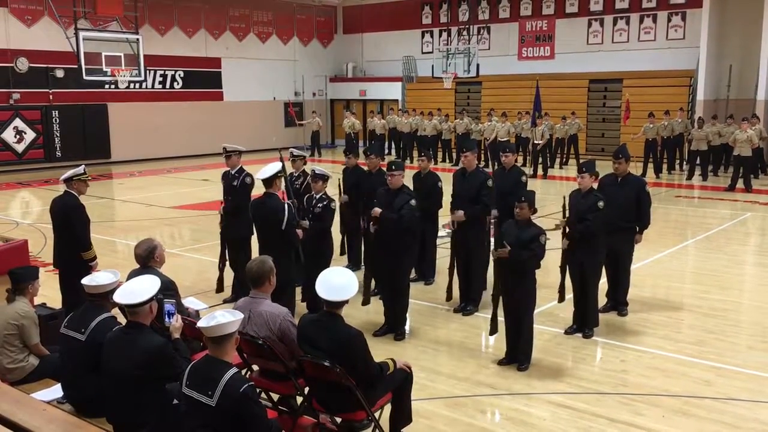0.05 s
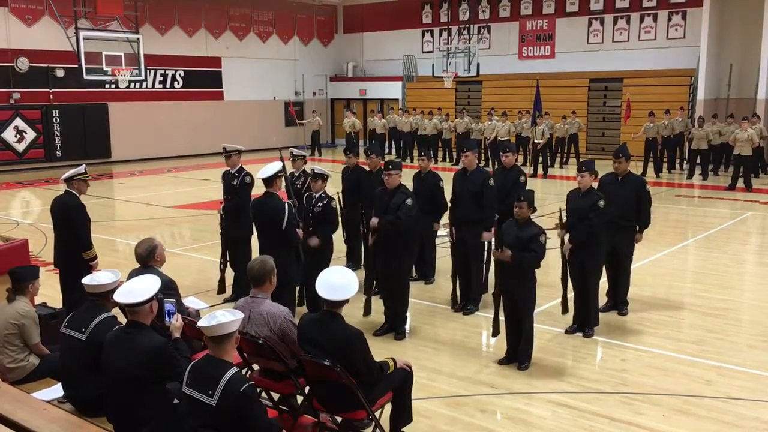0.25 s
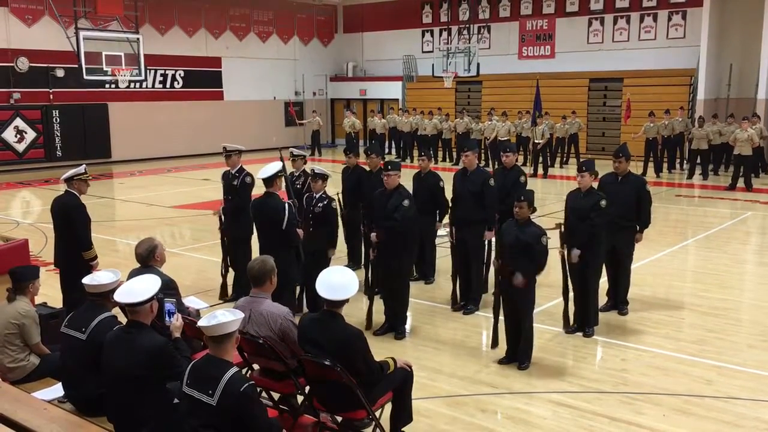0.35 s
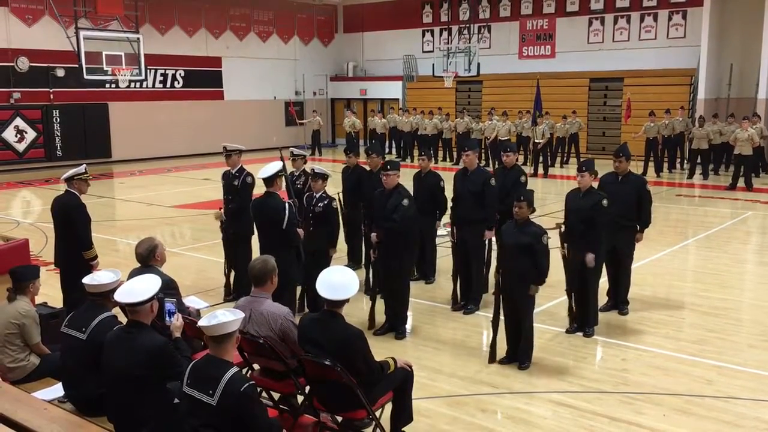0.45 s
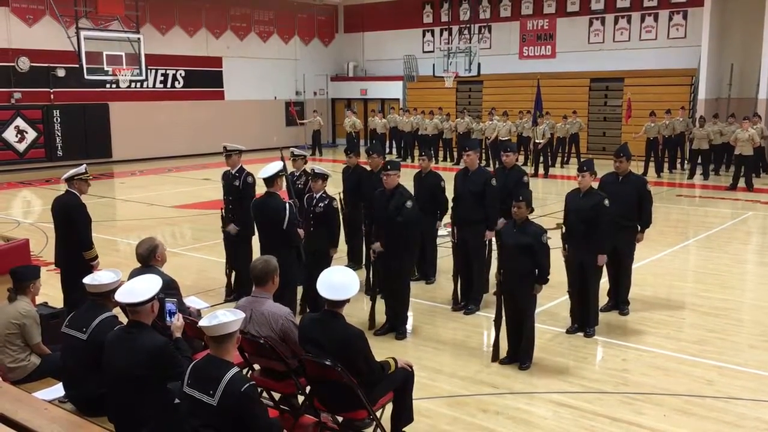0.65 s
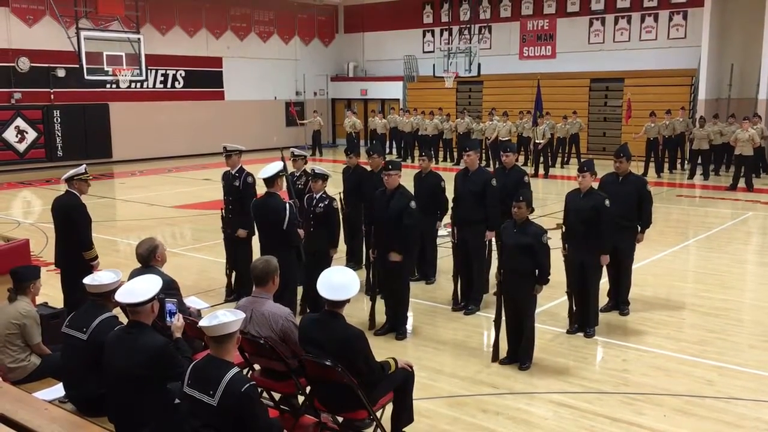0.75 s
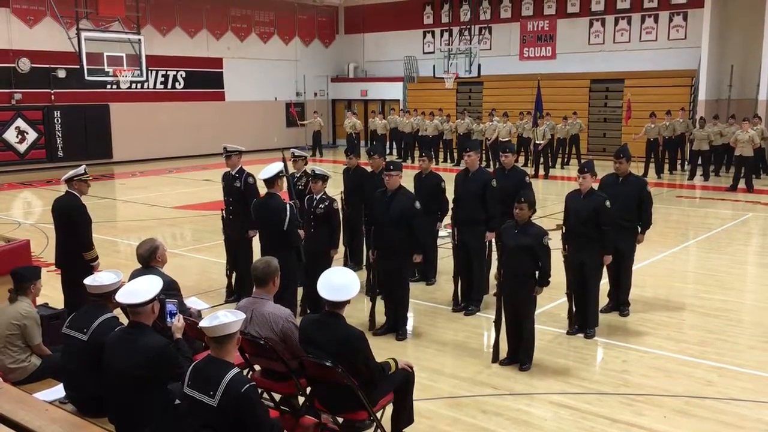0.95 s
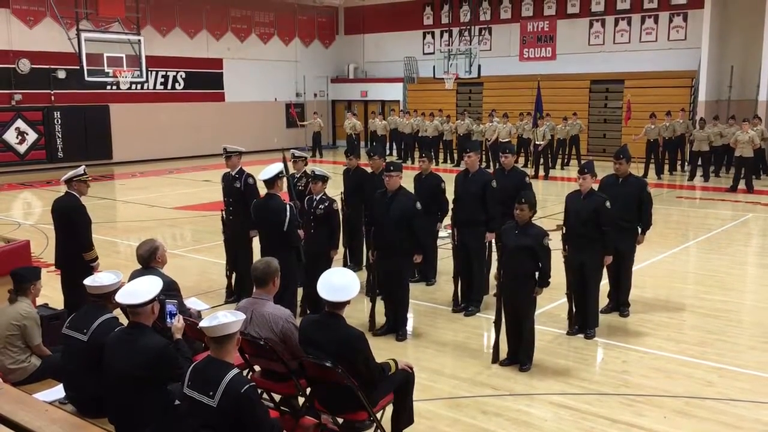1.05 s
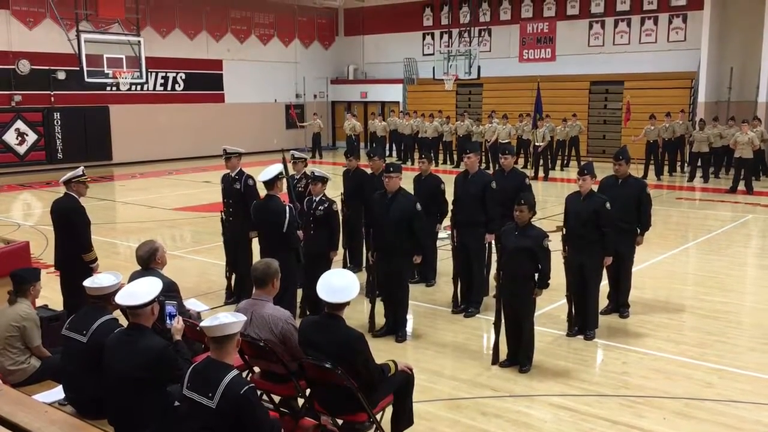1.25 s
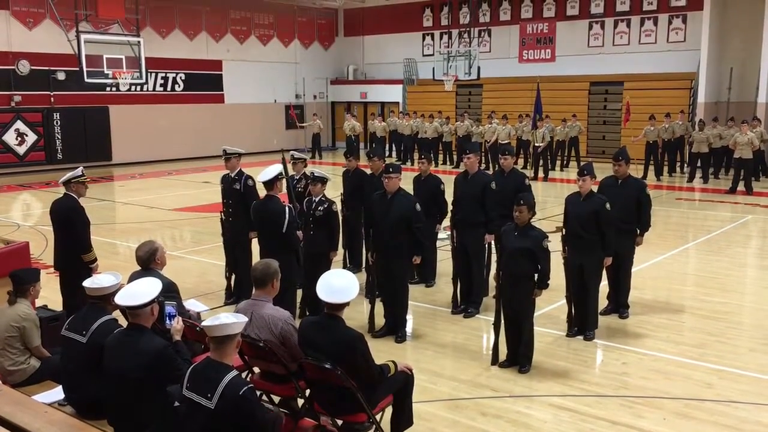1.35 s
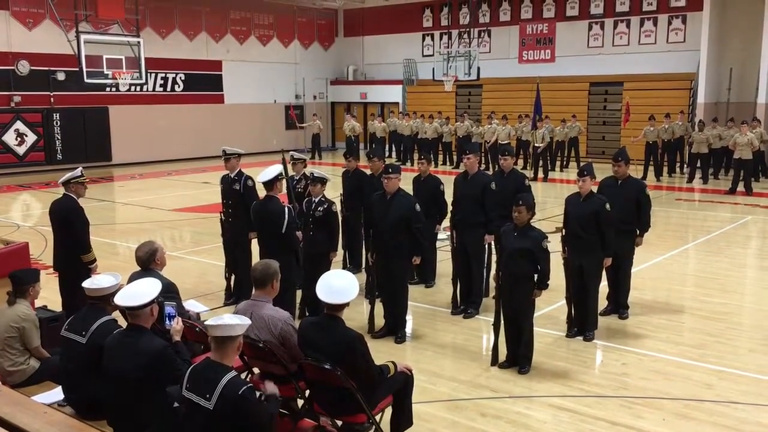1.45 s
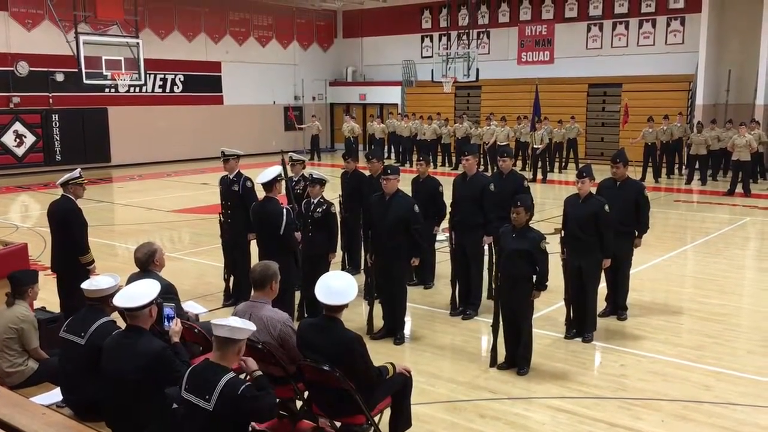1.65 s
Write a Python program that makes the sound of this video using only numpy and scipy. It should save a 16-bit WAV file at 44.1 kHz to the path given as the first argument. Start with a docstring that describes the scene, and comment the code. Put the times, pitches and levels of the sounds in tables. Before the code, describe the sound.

In a large, echoing gym, sleeves rustle softly, then several rifle butts knock down on the floorboards in three uneven clusters with sharp metallic clacks. The boomy reverberation dies away over a steady ventilation hum.

```python
"""A drill team grounds its rifles on the sprung wooden floor of a large gym, in three ragged volleys.
First, over the hum of the ventilation, cloth rustles and the rifles tick as they are handled.
Then each butt strikes: the impact excites the damped modes of boards and stock, a thump and a crack,
while jolted metal parts clack and a small fitting rings very high.
Last, the hall's reverberation dies away, slowest in the bass, with a few dull booms in its tail."""
import sys
import numpy as np
from scipy import signal
from scipy.fft import rfft, irfft
from scipy.io import wavfile

SR = 44100
rng = np.random.default_rng(int(sys.argv[2]) if len(sys.argv) > 2 else 0)


def digitize_waveform(pressure):
    """Quantize a signal to 16-bit integers and store it at the path in sys.argv[1].

    Rows of a 2-D input are taken as channels; values are limited to [-1, 1].
    """
    field = np.atleast_2d(pressure).T
    bounded = np.clip(field, -1, 1)
    quanta = np.round(bounded * 32767).astype(np.int16)
    wavfile.write(sys.argv[1], SR, quanta)


N = 74970
T = np.arange(N) / SR
EVENT_T = T[:12000]  # time axis of one short event


def amp(db):
    """Decibels as an amplitude ratio."""
    return 10 ** (np.asarray(db) / 20)


def unit_rms(x):
    """Normalisation to an rms of 1."""
    return x / np.sqrt(np.mean(x ** 2) + 1e-20)


def curve(table, hz, column=1):
    """Interpolation of one table column over log frequency."""
    columns = np.transpose(table)
    return np.interp(np.log(hz + 1), np.log(columns[0]), columns[column])


def decay(t, t60):
    """Exponential decay: 60 dB in t60 seconds."""
    return np.exp(-np.log(1000) * t / np.maximum(t60, 1e-3))


def onset(rise_s, t=EVENT_T):
    """First-order rise with time constant rise_s."""
    return 1 - np.exp(-t / rise_s)


def placed(start_s, sound):
    """A pure delay: the sound begins at start_s on a full-length track."""
    return np.concatenate([np.zeros(max(round(start_s * SR), 0)), sound, np.zeros(N)])[:N]


def mode(hz, db, t60):
    """Free vibration of a damped oscillator."""
    return amp(db) * decay(EVENT_T, t60) * np.sin(2 * np.pi * hz * EVENT_T)


def ring(modes, hz):
    """Superposition of damped modes at ratios of one pitch."""
    return sum(mode(hz * ratio, db, t60) for ratio, db, t60 in modes)


def burst(t60):
    """A broadband transient: white noise under exponential decay."""
    return decay(EVENT_T, t60) * rng.standard_normal(len(EVENT_T))


def coloured_noise(gain):
    """Spectral shaping of white noise, at unit rms."""
    return unit_rms(irfft(rfft(rng.standard_normal(N)) * gain, N))


def ventilation():
    """Broadband rumble and hiss, plus two hum tones that waver by slow amplitude modulation."""
    # air noise spectrum: frequency_hz, density_db
    air_spectrum = [(20, -14), (40, -10), (60, 11), (85, -5.5), (140, -9), (220, -14.5), (330, -24.5),
                    (500, -33.5), (1000, -37), (2000, -45.5), (2800, -47.5), (4000, -51), (7000, -56.5),
                    (10000, -62.5), (16000, -60)]
    # hum tones: pitch_hz, rms_db
    hum_tones = [(59.2, -40.5), (102.3, -48)]
    hz = np.fft.rfftfreq(N, 1 / SR)
    air = coloured_noise(amp(curve(air_spectrum, hz)) * np.minimum(hz / 20, 1))
    waver = coloured_noise(np.exp(-(hz / 5) ** 2))
    hum = sum(amp(db) * np.sqrt(2) * np.sin(2 * np.pi * (f * T + rng.random())) for f, db in hum_tones)
    return amp(-40.5) * air + hum * (1 + 0.1 * waver)


def rustle():
    """Friction noise of sleeves and slings as the rifles come down."""
    # cloth noise spectrum: frequency_hz, density_db
    cloth_spectrum = [(200, 12), (700, 0.5), (1400, 8.5), (2100, 7.5), (2750, -13), (3500, 3), (6500, 2.5),
                      (8000, 0.5), (15000, -22.5)]
    # its envelope: time_s, level_db
    envelope = [(0, -61.5), (0.06, -63), (0.09, -52), (0.14, -61), (0.21, -63.5), (0.3, -62), (0.5, -99)]
    cloth = coloured_noise(amp(curve(cloth_spectrum, np.fft.rfftfreq(N, 1 / SR))))
    return cloth * amp(np.interp(T, *np.transpose(envelope)))


def hall(x):
    """Reverberation: convolution with a diffuse response, drawn anew for each spot on the floor."""
    # reverberant tail: frequency_hz, level_db, t60_s
    bands = [(40, -10, 3.6), (75, 0.5, 3.54), (162, 1.5, 2.74), (280, -0.5, 1.2), (350, 0, 1.4),
             (436, -8, 1.6), (557, -1.5, 1.3), (740, -1.5, 1.63), (1040, -2, 1.25), (1670, -3, 1.45),
             (1730, -1.5, 1.57), (2450, 1, 1.26), (2800, 6.5, 1.66), (3200, 1.5, 1.32), (4100, -0.5, 1.245),
             (6570, -1.5, 1.044), (9100, -0.5, 0.91), (15000, -3.5, 0.78)]
    hz, t, noise = signal.stft(rng.standard_normal(N), SR, nperseg=512)
    decaying = noise * amp(curve(bands, hz))[:, None] * decay(t, curve(bands, hz, column=2)[:, None])
    early_scatter = 1 + amp(-4.5) * decay(T, t60=0.074)
    response = signal.istft(decaying, SR)[1][:N] * onset(rise_s=0.005, t=T) * early_scatter
    return signal.fftconvolve(x, response / np.sqrt(SR / 10))[:N]


def booms():
    """Damped low oscillations swell the bass a few times as the tail dies."""
    # dull booms: start_s, level_db, pitch_hz
    swells = [(0.724, -15, 90), (0.790, -21, 95), (0.897, -22, 100), (1.078, -18.5, 100), (1.200, -25, 88),
              (1.51, -29, 62)]
    return sum(placed(s, mode(hz, db, t60=0.17) * onset(rise_s=0.004)) for s, db, hz in swells)


def crack(db, tilt_db):
    """Modal overlap: dense wood resonances merge into noise, each band with its own damping."""
    # spectrum of butt and stock: frequency_hz, density_db, t60_s
    bands = [(198, -3.5, 0.094), (300, 1, 0.11), (415, -0.5, 0.046), (598, 1, 0.065), (724, -3.5, 0.037),
             (980, 2.5, 0.034), (1667, 8.5, 0.031), (2190, 0, 0.023), (2840, -13.5, 0.023),
             (3300, -6, 0.062), (4400, -3, 0.046), (4810, -8.5, 0.043), (6020, -2.5, 0.039),
             (7560, -12, 0.053), (11900, -13.5, 0.049), (16000, -18.5, 0.018)]
    hz = np.fft.rfftfreq(len(EVENT_T), 1 / SR)
    tilted_db = curve(bands, hz) + tilt_db * np.log2((hz + 1) / 2000)
    colour = unit_rms(amp(tilted_db) * hz / (hz + 100))  # bass rolls off below 100 Hz
    spectrum = rfft(rng.standard_normal(len(EVENT_T))) * colour
    centres_hz, _, t60s = np.transpose(bands)
    weights = [np.interp(np.log(hz + 1), np.log(centres_hz), peak) for peak in np.eye(len(bands))]
    wood = sum(irfft(spectrum * weight) * decay(EVENT_T, t60) for weight, t60 in zip(weights, t60s))
    return amp(db) * wood * onset(rise_s=0.00067)


def handling_ticks():
    """Light impacts on handled rifles: faint cracks with added damping."""
    # ticks: start_s, level_db, tilt_db_per_octave
    touches = [(0.066, -41, 0), (0.077, -53, 7), (0.089, -50, -4), (0.098, -46, -4), (0.1018, -39, 6.5),
               (0.12, -49, -2), (0.163, -50, -2), (0.223, -45.5, 2), (0.663, -38, 1), (0.800, -53.5, -3),
               (0.883, -48, 5)]
    ticks = sum(placed(s, crack(db, tilt) * decay(EVENT_T, t60=0.07)) for s, db, tilt in touches)
    return signal.sosfilt(signal.butter(2, 11000, fs=SR, output="sos"), ticks)


def fitting_pings():
    """A small fitting vibrates freely in one very high, lightly damped mode."""
    # pings: start_s, level_db
    pings = [(0.066, -44), (0.098, -50), (0.507, -43), (0.589, -44), (0.660, -47), (0.810, -54),
             (0.884, -47)]
    pitch_hz, spread_hz = 13290, 45
    return sum(placed(s, mode(rng.normal(pitch_hz, spread_hz), db, t60=0.15) * onset(rise_s=0.003))
               for s, db in pings)


def steel_snaps():
    """Steel meets steel: a brief contact gives a transient rich in treble."""
    # snaps: start_s, level_db
    contacts = [(0.237, -32), (0.2415, -27), (0.2487, -27), (0.4775, -24.5), (0.5007, -37)]
    snaps = sum(placed(s, amp(db) * burst(t60=0.011)) for s, db in contacts)
    return signal.sosfilt(signal.butter(2, 7000, "highpass", fs=SR, output="sos"), snaps)


def rifle_parts():
    """Loose metal clacks in inharmonic modes and reverberates along with the snaps, ticks and pings."""
    # clacks: start_s, level_db, pitch_hz, hall_send_db
    jolts = [(0.234, -31, 5920, 4), (0.238, -22.5, 4520, 1.5), (0.2448, -22, 6530, -0.5),
             (0.2500, -31, 6720, 0), (0.3100, -31.5, 6510, 5), (0.315, -34, 1560, 1),
             (0.318, -25.5, 4150, -0.5), (0.3155, -34.5, 11100, 4), (0.4805, -26, 2335, 2.5),
             (0.4820, -30, 3900, 2), (0.484, -28, 9200, -3.5), (0.4890, -33.5, 2166, 0),
             (0.504, -26.5, 3460, -17)]
    # modes of a metal part: pitch_ratio, level_db, t60_s
    metal_modes = [(.62, -15.5, 0.012), (.96, -10, 0.011), (1, -1, 0.018), (1.04, -12, 0.025),
                   (1.29, -7.5, 0.014), (1.85, -19, 0.012), (2.6, -14, 0.018)]
    clacks = [placed(s, amp(db) * (ring(metal_modes, hz) + amp(-12.5) * burst(t60=0.026)))
              for s, db, hz, _ in jolts]
    snaps, ticks, pings = steel_snaps(), handling_ticks(), fitting_pings()
    to_hall = sum(amp(send_db) * clack for (*_, send_db), clack in zip(jolts, clacks))
    to_hall += amp(-12) * snaps + amp(-4.5) * ticks + amp(-20) * pings
    return sum(clacks) + snaps + ticks + pings + hall(to_hall)


def stock_ring():
    """Free vibration of a wooden stock; its modes vary in tuning and polarity from rifle to rifle."""
    # modes of the stock: pitch_hz, level_db, t60_s
    stock_modes = [(533, -5, 0.064), (892, -4, 0.12), (1052, 0, 0.089), (1317, -28, 0.04), (1532, -1, 0.11),
                   (1911, -9.5, 0.061), (2206, -1, 0.096), (3200, -10, 0.091), (3620, -5.5, 0.03)]
    detune = 0.0277
    return sum(np.sign(rng.standard_normal()) * mode(hz * np.exp(rng.normal(0, detune)), db, t60)
               for hz, db, t60 in stock_modes)


def butt_strikes():
    """Impact excitation: each butt thumps the boards, cracks, rings its stock and drives the hall."""
    # landings: start_s, thump_db, pitch_hz, crack_db, tilt_db_per_octave, hall_send_db
    landings = [(0.2330, -9.5, 289, -16.5, -5.5, -2.5), (0.2496, -17.5, 529, -34, 0.5, -0.5),
                (0.2998, -15.5, 140.4, -29.5, -1, 4), (0.3061, -21.5, 218, -24.5, -3, -5.5),
                (0.3130, -11, 205.5, -18.5, -2, -1), (0.326, -21.5, 190, -30.5, 2, 3.5),
                (0.3347, -10.5, 188, -33, 3, -4.5), (0.473, -5, 229.5, -24, -1.5, -2.5),
                (0.4791, -11, 117, -23, 0, 1), (0.4874, -23, 140, -22.5, 1, 4.5),
                (0.5018, -7, 237, -20.5, -0.5, -3), (0.5357, -15, 136, -42, -2, -7)]
    # modes of the floorboards: pitch_ratio, level_db, t60_s
    board_modes = [(.42, -7, 0.048), (.72, -2.5, 0.039), (1, 4, 0.027), (1.55, -13.5, 0.02),
                   (2.0, -21.5, 0.014)]
    out = np.zeros(N)
    for s, thump_db, hz, crack_db, tilt_db, send_db in landings:
        thump = placed(s, amp(thump_db) * ring(board_modes, hz) * onset(rise_s=0.0017))
        stock = amp(crack_db - 18) * stock_ring()
        wood = placed(s, crack(crack_db, tilt_db) + stock)
        out += thump + wood + amp(send_db) * hall(amp(1.5) * thump + amp(1) * wood)
    return out


def scene():
    """Linear superposition of all sources in one channel."""
    return (butt_strikes() + rifle_parts() + booms() + rustle() + ventilation())[None]


def record(dry):
    """Band limiting: after a brief fade-in, the microphone sheds the deepest bass and the top treble."""
    fade_in_s, low_hz, high_hz = 0.008, 39, 15900
    highpass = signal.butter(4, low_hz, "highpass", fs=SR, output="sos")
    lowpass = signal.firwin(511, high_hz, window=("kaiser", 9), fs=SR)
    thinned = signal.sosfilt(highpass, dry * np.minimum(T / fade_in_s, 1))
    return signal.oaconvolve(thinned, lowpass[None], "same")


dry = scene()
out = record(dry)
digitize_waveform(out)
```